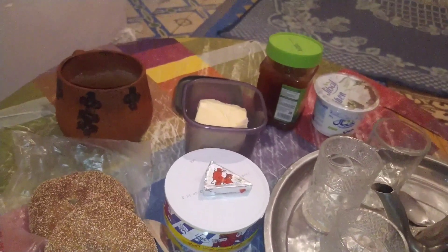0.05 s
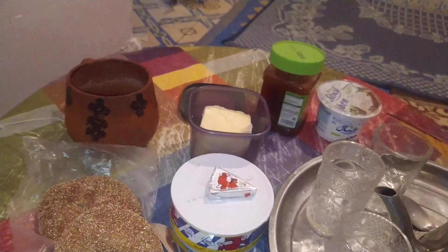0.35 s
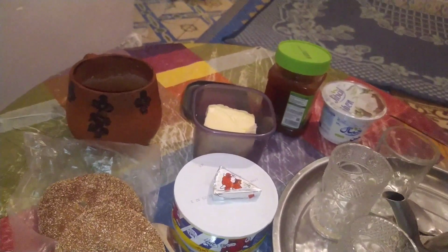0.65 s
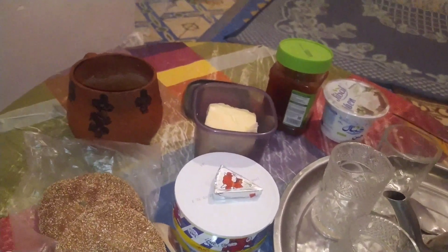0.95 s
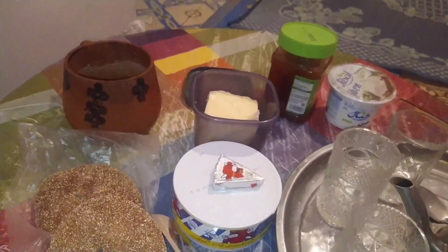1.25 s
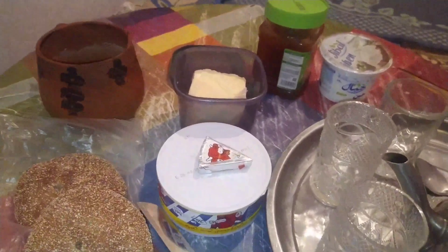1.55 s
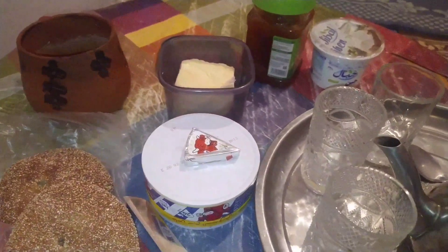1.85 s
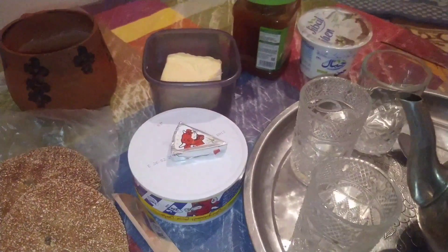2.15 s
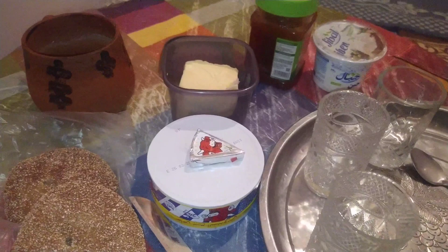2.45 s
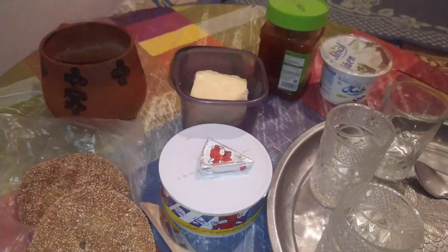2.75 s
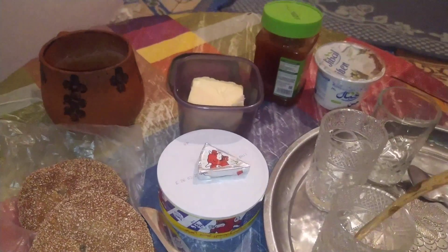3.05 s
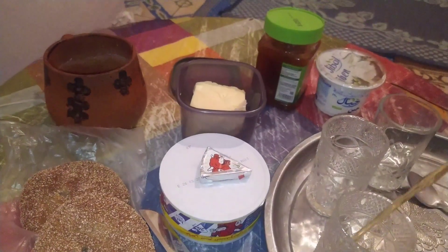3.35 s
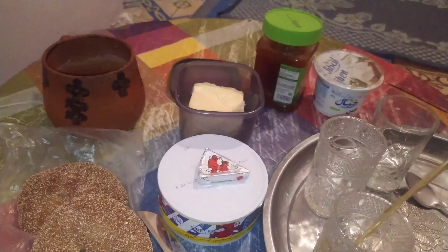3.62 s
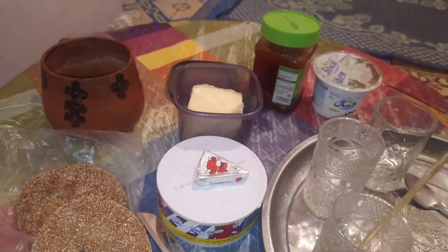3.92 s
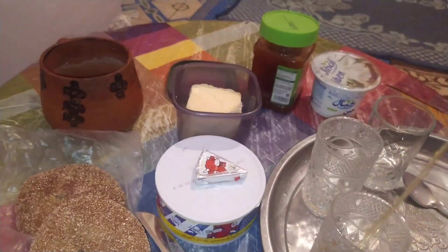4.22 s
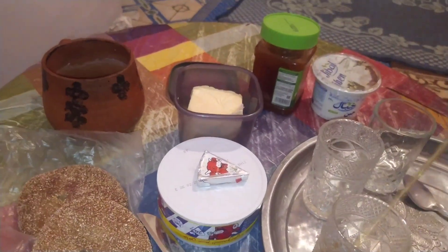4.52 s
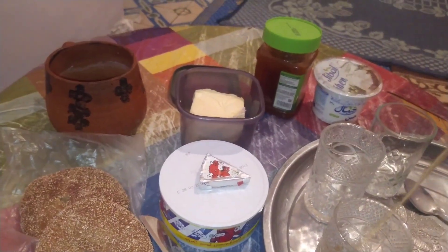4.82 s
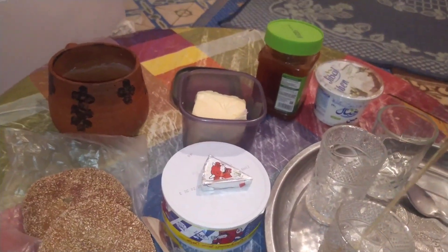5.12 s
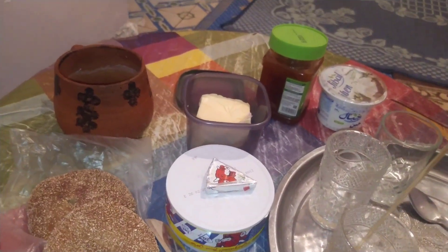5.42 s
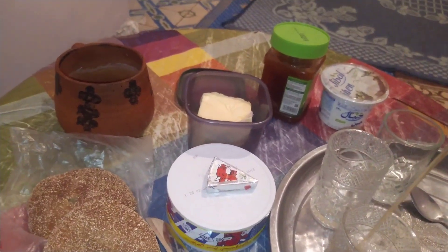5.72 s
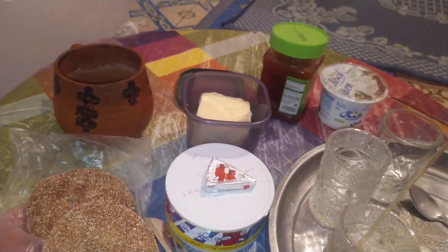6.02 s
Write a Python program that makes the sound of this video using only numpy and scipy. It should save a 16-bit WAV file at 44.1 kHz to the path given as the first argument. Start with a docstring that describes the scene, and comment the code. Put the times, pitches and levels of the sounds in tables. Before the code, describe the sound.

The scene is a small, quiet room, with the microphone near a table. In the first half second come a few light, gritty scrapes and a tap on a metal tray. At about 0.6 seconds a metal teapot gives one sharp, loud clack with a brief ring, and a softer tap follows at 1.1 seconds. From there until about 3 seconds, thin plastic crinkles and snaps quietly further off, thinning out, while a very faint low hum comes and goes. At 3.2 seconds tea begins falling into a glass, first as separate drips, small falling chirps and spurts of spray. By about 4 seconds it is a steady stream, full of bright plops, ticking droplets and fine fizz, over a gurgle that sinks as the liquid deepens. The pour is strongest around 4.5 seconds and is still running, slightly softer, at the end near 6.3 seconds.

```python
"""In a small room, a metal teapot is taken from its tray with one sharp clack that sets its modes ringing,
while plastic crinkles further off. Then tea falls from a height into a glass. The jet traps air, and each
bubble rings as a damped oscillator: first come falling chirps and spurts of spray, then plops near the
note of the air in the glass, over a gurgle that sinks as the pool deepens. A faint hum comes and goes."""
import sys
import numpy as np
from scipy import signal
from scipy.fft import rfft, irfft
from scipy.io import wavfile
from scipy.ndimage import uniform_filter1d

SR = 44100
rng = np.random.default_rng(int(sys.argv[2]) if len(sys.argv) > 2 else 0)


def store_pcm(level_fs):
    """Save levels as 16-bit WAV."""
    pcm = np.round(np.clip(level_fs, -1, 1) * 32767).astype(np.int16)
    wavfile.write(sys.argv[1], SR, np.atleast_2d(pcm).T)


N = 276507
TIME = np.arange(N) / SR
POUR_S, BAND_LIMIT_HZ = 3.2, 16300

# Strength of the jet, from drips to a steady pour. Each row: time in seconds, level in dB.
JET_STRENGTH = [(3.2, -20), (3.3, -10.5), (3.36, -9.5), (3.52, -8.5), (3.8, -3), (4.1, -2), (4.55, 0),
                (5.6, -1.5), (5.74, -4.5), (5.8, -1), (6.17, -3.5), (6.27, -5.5)]
# The first bubbles. Each row: start in seconds, level in dB, first and last pitch in Hz, splash in dB.
CHIRPS = [(3.259, -33.5, 1450, 1010, -2), (3.339, -34, 1950, 1340, 4), (3.354, -41, 2350, 1920, -7),
          (3.362, -40, 2250, 1560, -3), (3.376, -36, 1410, 980, -6), (3.445, -41, 1090, 850, 4),
          (3.513, -40, 836, 735, 0), (3.552, -31, 1740, 1320, -8), (3.686, -28, 1410, 820, -3),
          (3.729, -30, 1380, 1070, -5), (3.786, -19.5, 1460, 876, -29), (3.801, -25.5, 1793, 1210, -18),
          (3.883, -20, 1468, 700, -13), (4.027, -28, 1500, 666, -20), (4.052, -24.5, 1050, 750, -3)]
# The largest bubbles. Each row: start in seconds, level in dB, pitch in Hz, relative splash in dB.
PLOPS = [(3.645, -37, 1180, 3), (3.758, -28, 1280, 4), (3.966, -25.5, 1230, -22), (4.025, -21, 1370, -8),
         (4.071, -20.5, 596, -20), (4.104, -28, 610, -10), (4.185, -20, 587, -10), (4.209, -20.5, 1195, -8),
         (4.296, -29.5, 1186, 3), (4.334, -21, 1240, -5), (4.41, -8, 1300, -18), (4.431, -36, 1460, 14),
         (4.497, -14.5, 1395, -17), (4.535, -16, 1220, -16), (4.674, -24.5, 1270, -20),
         (4.696, -15, 1310, -6), (4.731, -30, 1420, -22), (4.822, -21, 1294, -6), (4.879, -17.5, 1240, -35),
         (4.961, -17.5, 1503, -2), (4.997, -19, 1395, -4.5), (5.027, -24, 1294, -22),
         (5.072, -20.5, 1260, -34), (5.162, -17.5, 1335, -5), (5.191, -20.5, 1360, -11),
         (5.253, -20.5, 1350, -32), (5.282, -22, 1360, -25), (5.321, -23, 1360, -6),
         (5.343, -17.5, 1347, -9.5), (5.364, -20.5, 1320, -4), (5.469, -22, 1430, -13),
         (5.516, -16.5, 1310, -8), (5.553, -19.5, 1530, -28), (5.57, -17, 1290, -28),
         (5.612, -23.5, 1240, 1.5), (5.687, -18.5, 1335, -9.5), (5.771, -22.5, 1370, -3),
         (5.8, -19, 1450, -3), (5.824, -18.5, 1360, -8), (5.857, -27.5, 1400, 6), (5.904, -27, 1420, -20),
         (5.921, -15, 1426, -29), (6.016, -18.5, 1380, -35), (6.118, -23, 1356, -21),
         (6.165, -20.5, 1370, -11)]
# What the glass lets out of the pool's low sound. Each row: frequency in Hz, gain in dB.
POOL_SPECTRUM = [(120, -22.5), (180, 3), (260, -2), (390, 2), (650, -2.5), (880, 7), (1040, -2.5),
                 (1300, -26), (2500, -21)]
# The colour of splashing. Each row: frequency in Hz, gain in dB.
SPLASH_SPECTRUM = [(900, -39), (1600, 6.5), (2300, -2.5), (3100, -1.5), (4500, -17), (7000, 18.5),
                   (8800, -42), (10500, 7.5), (16000, -18)]


def amp(db):
    """Amplitude ratio of a level in decibels."""
    return 10 ** (np.asarray(db) / 20)


def unit_rms(x):
    """Normalisation to unit mean power."""
    return x / np.sqrt(np.mean(x ** 2) + 1e-20)


def at_hz(points, hz):
    """Interpolation on a logarithmic frequency axis."""
    frequencies, values = np.transpose(points)
    return np.interp(np.log(hz + 1), np.log(frequencies + 1), values)


def at_time(rows, s):
    """Linear interpolation of a curve at time s."""
    return np.interp(s, *np.transpose(rows))


def add(mix, s, sound):
    """Superposition: a sound joins the mix at time s."""
    part = mix[max(round(s * SR), 0):][:len(sound)]
    part += sound[:len(part)]


def colour(x, spectrum):
    """Minimum-phase filtering, of unit energy, with the given spectrum."""
    log_gain = np.log(amp(at_hz(spectrum, abs(np.fft.fftfreq(4096, 1 / SR)))))
    response = np.exp(np.conj(signal.hilbert(log_gain)))
    taps = np.fft.ifft(response).real[:2048]
    return signal.oaconvolve(x, taps / np.linalg.norm(taps))[:len(x)]


def burst(t, decay_s):
    """White noise in exponential decay."""
    return rng.standard_normal(len(t)) * np.exp(-t / decay_s)


def clicks(size, per_s, spread_db):
    """A Poisson train of impulses, most of them small."""
    chance, height, sign = rng.random(size), rng.exponential(1, size), rng.choice([-1., 1.], size)
    return sign * amp(spread_db * np.minimum(height, 3)) * (chance < per_s / SR)


def bubble(hz, cycles, rise):
    """A damped oscillator swells for some cycles and dies; a bubble's pitch rises near the surface."""
    age = np.arange(0, 6, hz / cycles / SR)  # in swell times
    turns = cycles * (age + rise * (age * age / 2 - age)) + rng.random()
    return (age * np.exp(1 - age)) ** 2 * np.sin(2 * np.pi * turns)


def diffuse(pair):
    """A diffuse field is partly coherent at two nearby points."""
    # Each row: frequency in Hz, correlation of the channels.
    coherence = [(30, 0.064), (150, 0.072), (350, 0.34), (900, 0.036), (2000, 0.19), (15000, 0.093)]
    left, other = rfft(pair)
    alike = at_hz(coherence, np.fft.rfftfreq(pair.shape[1], 1 / SR))
    return irfft([left, alike * left + np.sqrt(1 - alike ** 2) * other], pair.shape[1])


def in_room(x, wet_db, left_db, lead):
    """Direct sound, left_db louder and lead samples earlier on the left, plus diffuse reverberation."""
    # Each row: frequency in Hz, time to fall 60 dB in seconds.
    reverb_times = [(150, 1), (500, 0.5), (1500, 0.38), (4700, 0.3), (8000, 0.27), (15000, 0.11)]
    hz, t, bands = signal.stft(rng.standard_normal((2, SR // 2)), SR, nperseg=256)
    decay = amp(-60 * t / at_hz(reverb_times, hz)[:, None])
    onset = 1 - np.exp(-(t / .00067) ** 2)
    tail = diffuse(signal.istft(bands * decay * onset, SR)[1])
    wet = signal.fftconvolve(x[None], tail / np.linalg.norm(tail[0]), axes=1)[:, :N]
    delayed = irfft(rfft(x) * np.exp(-2j * np.pi * np.fft.rfftfreq(N) * lead), N)
    direct = np.array([x * amp(left_db / 2), delayed * amp(-left_db / 2)])
    return direct + amp(wet_db) * wet * amp([[.7], [-.7]])


def room_air():
    """Still air is heard as a faint diffuse field of noise."""
    # Each row: frequency in Hz, gain in dB.
    spectrum = [(12, 12.5), (25, -0.5), (50, -3), (100, -15), (250, -10), (600, -18), (2000, -33.5),
                (4500, -29.5), (8500, -28.5), (10500, -38.5), (15000, -47)]
    noise = np.array([unit_rms(colour(x, spectrum)) for x in rng.standard_normal((2, N))])
    return amp(-58) * diffuse(noise) * amp([[-1.5], [1.5]])


def hum():
    """Slow modulation makes a low tone waver; it swells and sinks together with a band of noise."""
    # Each row: time in seconds, pitch in Hz.
    pitch = [(1.15, 194.3), (1.3, 175), (1.5, 177.3), (1.65, 198.5)]
    # Each row: start in seconds, length in seconds, level in dB.
    swells = [(0.05, 0.36, -60.5), (0.425, 0.4, -55.5), (1.002, 0.69, -61.5), (1.715, 0.15, -56),
              (1.903, 0.43, -61.5), (3.676, 0.31, -68.5)]
    level = np.full(N, amp(-71.5))
    for s, length, db in swells:
        add(level, s, amp(db) * np.sin(np.pi * np.linspace(0, 1, round(length * SR)) ** .55))
    waver = unit_rms(uniform_filter1d(rng.standard_normal(N), SR // 20))
    tone = unit_rms(np.sin(2 * np.pi * np.cumsum(at_time(pitch, TIME) + 3 * waver) / SR))
    band = signal.butter(2, [110, 290], "band", fs=SR, output="sos")
    murmur = unit_rms(signal.sosfilt(band, rng.standard_normal(N)))
    return level * (amp(-3) * tone * (1 + .35 * waver) + amp(-3.5) * murmur)


def hollow_tones():
    """Two soft, hollow tones swell and die as damped oscillations."""
    # Each row: start in seconds, level in dB, pitch in Hz, swell in cycles.
    tones = [(1.715, -49, 310, 4.3), (2.669, -68, 661.5, 50)]
    out = np.zeros(N)
    for s, db, hz, cycles in tones:
        add(out, s, amp(db) * bubble(hz, cycles, rise=-.0027))
    return in_room(out, wet_db=-15, left_db=-2, lead=1)


def plastic():
    """Thin plastic buckles in snaps over a soft rustle; at a distance, reverberation dominates."""
    # Each row: start in seconds, level in dB.
    snaps = [(0.189, -43.5), (1.173, -35.5), (1.234, -37), (1.269, -31), (1.345, -37), (1.402, -42),
             (1.473, -42), (1.511, -43.5), (1.56, -39.5), (1.591, -37), (1.689, -40.5), (1.719, -39.5),
             (1.903, -36.5), (1.972, -38.5), (2.005, -44), (2.032, -38), (2.065, -38), (2.168, -38.5),
             (2.188, -40), (2.343, -38.5), (2.472, -40), (2.54, -41), (2.646, -41.5), (2.735, -43.5),
             (2.883, -49), (2.947, -49), (3.127, -53.5)]
    # Each row: frequency in Hz, gain in dB.
    spectrum = [(180, -13), (300, -17.5), (511, -13), (900, -6), (1190, -8), (2000, -3), (6000, -17),
                (8500, -9.5), (11000, -27.5), (16000, -34.5)]
    # Two spells of handling. Each row: time in seconds, level in dB.
    rustle = [(0, -49.5), (.35, -44), (.55, -43.5), (.95, -54), (1.15, -37.5), (1.5, -49.5), (2.05, -47),
              (2.6, -56.5), (3.2, -96)]
    t, out = TIME[:SR // 10], np.zeros(N)
    for s, db in snaps:
        creases = unit_rms(clicks(len(t), per_s=1500, spread_db=5)) * np.exp(-t / .007)
        snap = colour(1.18 * burst(t, .001) + .77 * creases, spectrum)
        body = signal.sosfilt(signal.butter(1, 4000, fs=SR, output="sos"), snap)
        treble = snap - body
        add(out, s, amp(db - 8.5) * (body + amp(2) * treble))
    folds = clicks(N, per_s=220, spread_db=8)
    out += amp(at_time(rustle, TIME) - 20) * unit_rms(colour(folds, spectrum))
    return in_room(out, wet_db=4.5, left_db=3, lead=0)


def handling():
    """Friction makes gritty scrapes as the teapot is gripped; soft impacts excite the tray's modes."""
    # Each row: start in seconds, level in dB, brightest frequency in Hz, decay in seconds.
    scrapes = [(0.071, -34.5, 7200, .016), (0.082, -26.5, 7100, .01), (0.298, -37, 6330, .008),
               (0.306, -29.5, 7470, .007), (0.424, -44, 6500, .009), (0.456, -44, 6800, .014),
               (0.999, -42.5, 7740, .01), (1.099, -42.5, 7800, .01)]
    # Each row: ratio to the brightest frequency, gain in dB.
    scrape_shape = [(.05, -22), (.13, -10), (.25, -13), (.48, -8.5), (.62, -4), (.78, -8.5), (1, 3),
                    (1.2, -4.5), (1.45, -16), (2.2, -30)]
    # Each row: start in seconds, level in dB, relative ring in dB.
    taps = [(0.436, -21, -7), (1.079, -25, -22)]
    # Each row: frequency in Hz, gain in dB.
    knock_spectrum = [(500, -23.5), (950, -18.5), (1240, -1.5), (1600, -15.5), (2200, -10.5), (3400, -12),
                      (4600, -9), (5600, -29), (7200, -10.5), (11000, -39.5)]
    # Each row: frequency in Hz, level in dB, time to fall 60 dB in seconds.
    tray_modes = [(1257, -3, 0.042), (3260, -9.5, 0.045), (4240, -10.5, 0.072), (6600, -10.5, .05)]
    t, out = TIME[:SR // 2], np.zeros(N)
    for s, db, hz, decay_s in scrapes:
        envelope = np.exp(-t / decay_s) * (1 - np.exp(-t / .002))
        grit = unit_rms(clicks(len(t), per_s=4000, spread_db=4)) * envelope
        spectrum = [(ratio * hz, gain) for ratio, gain in scrape_shape]
        add(out, s, amp(db - 8.5) * colour(grit, spectrum))
    for s, db, ring_db in taps:
        knock = colour(burst(t, .00092), knock_spectrum)
        add(out, s, amp(db - 8.5) * (knock + amp(ring_db) * ring(t, tray_modes)))
    return in_room(out, wet_db=1.5, left_db=8, lead=5.3)


def ring(t, modes):
    """Free vibration after a blow is a sum of decaying normal modes."""
    return sum(amp(db - 60 * t / t60) * np.sin(2 * np.pi * (hz * t + rng.random()))
               for hz, db, t60 in modes)


def teapot():
    """Impact excites the metal's modes: the lid chatters and rings until it seats; the body rings on."""
    # Each row: start in seconds, force in dB.
    blows = [(0.6315, 7.5), (0.6349, 16.5), (0.6367, -5), (0.6406, 5.5), (0.642, -2), (0.6571, -10.5),
             (0.733, -15)]
    # Each row: frequency in Hz, gain in dB.
    crack_spectrum = [(100, -28), (300, -20), (535, -23), (720, -12), (1020, -19), (1300, -5), (1900, -11),
                      (2580, -8), (3400, -14), (4300, -7), (4880, -1), (5400, -15), (6000, -16), (6900, 0),
                      (8000, -7), (9500, -14), (11500, -27), (16000, -32)]
    # Each row: frequency in Hz, level in dB, time to fall 60 dB in seconds.
    modes = [(877, -15, .35), (1229, -8, .36), (1981, -16, .22), (2567, -8, .28), (3483, -13, .2),
             (4215, -9, .13), (4363, -8, .14), (4403, -7, .17), (4569, -4, .1), (4718, -1, .09),
             (4850, -1, .09), (6654, -6, .19), (6902, -2, .16), (7031, -3, .12), (7374, -4, .16),
             (7472, -7, .19), (8000, -9, .2)]
    t, cracks, ringing = TIME[:SR // 2], np.zeros(N), np.zeros(N)
    for s, db in blows:
        contact = burst(t, .0024) * (1 - np.exp(-t / .0005))
        add(cracks, s, amp(db - 20) * colour(contact, crack_spectrum))
    lid_free = 1 / (1 + np.exp(np.minimum((t - .012) / .001, 50)))  # seats after 12 ms
    lid = amp(-18.5) * ring(t, modes) * lid_free
    body = amp(-30) * ring(t, modes)
    add(ringing, blows[0][0], lid + body)
    return (in_room(cracks, wet_db=-3, left_db=2.5, lead=11.36)
            + in_room(ringing, wet_db=-20, left_db=2.5, lead=1))


def progress(s):
    """The glass fills at a steady rate: 0 as the pour starts, 1 at the end."""
    return np.clip((s - POUR_S) / (TIME[-1] - POUR_S), 0, 1)


def jet_share(s):
    """Air entrainment grows to its full rate as drips join into a jet."""
    return np.interp(s, [POUR_S, POUR_S + 1.1], [.3, 1])


def pool_hz(s):
    """Minnaert resonance: a deepening pool traps larger bubbles, which ring lower."""
    shallow_hz, deep_hz, deepen_s = 1100, 578, .818
    return deep_hz + (shallow_hz - deep_hz) * np.exp(-((s - POUR_S) / deepen_s) ** 2)


def glass_hz(s):
    """The resonance of an air column rises in inverse proportion to its length."""
    empty_hz, final_fill = 1184, .2
    return empty_hz / (1 - final_fill * progress(s))


def wake():
    """Agitation dips as the jet thins before each blob, then jumps and decays exponentially."""
    wake_s, full_wake_db, lull_s, lull_depth = .011, -23, .028, .52
    stir, lull, t = np.zeros(N), np.zeros(N), TIME[:SR // 4]
    for s, db, *_ in CHIRPS + PLOPS:
        add(stir, s - .002, amp((db - full_wake_db) / 2) * np.exp(-t / wake_s))
        add(lull, s - lull_s, np.sqrt(np.linspace(0, 1, round(lull_s * SR))))
    return np.minimum(stir, 1) - lull_depth * np.minimum(lull, 1)


def follow_jet(x, db, exponent, fill_db, wake_db):
    """Amplitude is a power law of the jet's strength, shifted by the filling and by each wake."""
    level_db = db + exponent * at_time(JET_STRENGTH, TIME) + fill_db * progress(TIME) + wake_db * wake()
    return amp(level_db) * x / np.std(x[TIME > POUR_S])


def clumps():
    """Spray flies in clumps: a log-normal gain that changes every few hundredths of a second."""
    drift = unit_rms(uniform_filter1d(rng.standard_normal(N), round(.025 * SR)))
    return unit_rms(amp(4 * drift))


def swarm(per_s, pitch, cycles, spread_db):
    """Random bubbles add incoherently; pitch(s, z) gives Hz from the time and a bell-shaped draw."""
    out = np.zeros(N)
    for when, chance, quantile, size, length in rng.random((round(per_s * TIME[-1]), 5)):
        s = when * TIME[-1]
        if s > POUR_S and chance < jet_share(s):
            z = np.clip(np.log(quantile / (1 - quantile)) / 2, -2, 2)
            hz = min(pitch(s, z), BAND_LIMIT_HZ)
            db = spread_db * min(-np.log(size), 2)
            add(out, s, amp(db) * bubble(hz, cycles * (.5 + length), rise=.035))
    return out / np.sqrt(jet_share(TIME))  # power stays independent of the rate


def spray():
    """The smallest sources sound highest: tiny bubbles fizz, bursting froth crackles and mist hisses."""
    # Three spectra. Each row: frequency in Hz, gain in dB.
    fizz_spectrum = [(1500, -30), (3000, 32), (5000, 2.5), (7000, -0.5), (8800, 13.5), (10300, -4),
                     (13000, -48), (16000, -40)]
    froth_spectrum = [(1200, -16), (2600, -25), (4000, 4.5), (6500, -13), (9000, 2), (11000, -10.5),
                      (16000, -33)]
    mist_spectrum = [(6000, -38.5), (9500, -4), (11500, 0.5), (14000, 4), (15200, 2), (16300, -27.5)]
    # The mist thins once the pool is deep. Each row: time in seconds, level in dB.
    mist_level = [(3.2, -100), (3.33, -82), (3.58, -74), (4.3, -74), (4.5, -69), (4.85, -71), (5.15, -78),
                  (5.7, -83), (6.27, -85)]
    fizz = swarm(550, lambda s, z: 7500 * np.exp(.22 * z), cycles=3, spread_db=9)
    froth = colour(clicks(N, per_s=110, spread_db=7), froth_spectrum)
    mist = unit_rms(colour(clicks(N, per_s=3500, spread_db=4), mist_spectrum))
    out = follow_jet(colour(fizz, fizz_spectrum), db=-52, exponent=.9, fill_db=0, wake_db=9)
    out += follow_jet(froth, db=-54.5, exponent=1.5, fill_db=-2, wake_db=5) * (TIME > POUR_S)
    out += amp(at_time(mist_level, TIME) + 8 * wake()) * mist
    return in_room(out * clumps(), wet_db=-8, left_db=3.5, lead=3.5)


def small_drops(per_s=16, top_hz=9200, octaves=1.1, tick_db=-24, spit_db=-10):
    """Lesser drops land at uniformly random times, louder in a stronger jet."""
    length = TIME[-1] - POUR_S
    when, size, pitch = rng.random((round(per_s * length), 3)).T
    starts = POUR_S + length * when
    levels = -40 + 16 * (size - .5) + at_time(JET_STRENGTH, starts)
    pitches = top_hz / 2 ** (octaves * pitch ** 2)
    return [(s, db, hz, tick_db, spit_db) for s, db, hz in zip(starts, levels, pitches)]


def drops():
    """Drop impact: each ticks on the glass, spits as it breaks up and traps a tiny bubble that pings."""
    # Each row: start in seconds, level in dB, pitch in Hz, relative tick and spit in dB.
    large_drops = [(3.2073, -26.5, 7530, -34, -19.5), (3.26, -37, 8900, -32, -23),
                   (3.32, -36, 8100, -29, -27), (3.3304, -35, 8500, -26, -13), (3.347, -26, 8000, -35, -14),
                   (3.3557, -33, 8850, -30, -21), (3.4218, -34.5, 8900, -16, -16),
                   (3.4466, -38, 8460, -23, -5), (3.5338, -38, 7800, -26, -0.5),
                   (3.5464, -24, 7550, -36, -15), (3.593, -27.5, 7070, -18, -5),
                   (3.6444, -23, 6000, -30, -13), (3.6545, -19, 9030, -44, -17),
                   (3.687, -23, 8600, -42, -33), (3.712, -30, 9000, -42, -9), (3.7696, -30, 9200, -12, 3.5),
                   (3.801, -12.5, 8380, -43, -34), (3.8134, -18.5, 9100, -47, -13),
                   (3.883, -35, 8450, -25, 3), (3.9586, -17, 8230, -30, -15), (4.068, -31.5, 9000, -25, -1),
                   (4.1818, -31, 9150, -27, -23), (4.1959, -24, 7840, -38, -8),
                   (4.2375, -37, 8500, -29, 7.5), (4.4061, -27, 7800, -23, 2.5),
                   (4.447, -35, 8060, -5, 6.5), (4.463, -31, 8100, -23, 6), (4.47, -22, 6050, -27, -13.5),
                   (4.5329, -20, 7640, -33, -8), (4.614, -37.5, 8040, -2.5, 0.5),
                   (4.731, -20, 7960, -20, -10.5), (4.862, -31, 8350, -22, -13),
                   (4.9592, -16.5, 8230, -47, -19), (5.0154, -21, 8700, -28, -14),
                   (5.1599, -17.5, 5750, -36, -9.5), (5.4106, -34, 8800, -11, -1),
                   (5.459, -18, 7050, -34, -12), (5.555, -18.5, 7900, -34, -13.5),
                   (5.5877, -13.5, 7200, -53, -16), (5.9187, -33.5, 8500, -36, 5),
                   (5.997, -24.5, 6990, -29, -26), (6.113, -21, 8340, -37, -14.5)]
    # Two spectra. Each row: frequency in Hz, gain in dB.
    tick_spectrum = [(2000, -19), (8000, 4), (11500, -5), (13000, -8), (16000, -14.5)]
    spit_spectrum = [(900, -15), (3000, -4.5), (6500, 5.5), (9000, 5.5), (10500, -15), (16000, -29)]
    t, spits, pings = TIME[:SR // 20], np.zeros(N), np.zeros(N)
    for s, db, hz, tick_db, spit_db in large_drops + small_drops():
        add(pings, s + .0006, amp(db - 2) * bubble(hz, cycles=4.2, rise=.02))
        add(pings, s + .0005, amp(db + tick_db + 8) * colour(burst(t, .0016), tick_spectrum))
        add(spits, s + .0005, amp(db + spit_db + .5) * colour(burst(t, .0022), spit_spectrum))
    return (in_room(spits, wet_db=-5, left_db=3, lead=3.5)
            + in_room(pings, wet_db=-10, left_db=3.5, lead=3.5))


def spurts():
    """The jet's impact on the wall of the glass sheds showers of tiny bubbles that quickly thin out."""
    # Each row: start in seconds, length in seconds, level in dB.
    showers = [(3.555, 0.091, -53), (3.643, 0.0096, -42), (3.758, 0.013, -37), (3.772, 0.0087, -43.5),
               (3.882, .015, -48.5), (4.022, .014, -42), (4.204, 0.016, -46.5), (4.408, 0.018, -53)]
    out = np.zeros(N)
    for s, length, db in showers:
        shower = np.zeros(round(length * SR))
        for when, size, pitch in rng.random((40, 3)):
            hz = 2700 * 2 ** (1.5 * pitch ** 2)
            add(shower, length * when ** 2, amp(-12 * size) * bubble(hz, cycles=2.2, rise=.05))
        add(out, s, amp(db) * unit_rms(shower))
    return in_room(out, wet_db=-7, left_db=2, lead=4.9)


def stream():
    """Entrained air rings near the note of the glass, in fine spatter and in a sinking gurgle."""
    # What the open mouth of the glass radiates. Each row: frequency in Hz, gain in dB.
    mouth_spectrum = [(400, -24), (700, -9), (870, 9), (1040, -1), (1170, 9), (1480, 12), (1800, 6),
                      (6000, -8)]
    near_note = swarm(200, lambda s, z: glass_hz(s) * np.exp(.11 * z), cycles=2, spread_db=7)
    fine = swarm(380, lambda s, z: 3000 * np.exp(.32 * z), cycles=2.4, spread_db=6.5)
    # a deeper pool traps a wider range of bubble sizes
    deep = swarm(700, lambda s, z: pool_hz(s) * (1500 / pool_hz(s)) ** (.42 * z), cycles=1.8, spread_db=2)
    churn = follow_jet(colour(near_note, mouth_spectrum), db=-47.5, exponent=1.53, fill_db=7, wake_db=.5)
    spatter = follow_jet(colour(fine, SPLASH_SPECTRUM), db=-51.5, exponent=1, fill_db=-4, wake_db=7.5)
    gurgle = follow_jet(colour(deep, POOL_SPECTRUM), db=-44, exponent=1.6, fill_db=-10, wake_db=9.5)
    return (in_room(churn + spatter * clumps(), wet_db=-4, left_db=1, lead=4.95)
            + in_room(gurgle, wet_db=-15.5, left_db=-1, lead=8.6))


def splash():
    """An impact on the pool throws a puff of spatter and traps four small bubbles."""
    t = TIME[:SR // 20]
    out = amp(-4) * burst(t, .004) * (1 - np.exp(-t / .001))
    for when, size in rng.random((4, 2)):
        add(out, .007 * when, bubble(1900 + 1800 * size, cycles=2.2, rise=.05))
    return colour(out, SPLASH_SPECTRUM)


def chirps(swell_s=.0042, fall_s=.006):
    """The resonance of each early bubble glides down as the jet digs into the shallow pool."""
    t, out = TIME[:SR // 20], np.zeros(N)
    envelope = (t / swell_s * np.exp(1 - t / swell_s)) ** 2
    for s, db, start_hz, end_hz, splash_db in CHIRPS:
        hz = end_hz + (start_hz - end_hz) * np.exp(-(t / fall_s) ** 2)
        tone = np.sin(2 * np.pi * (np.cumsum(hz) / SR + rng.random()))
        add(out, s, amp(db - 10.5) * envelope * tone)
        add(out, s, amp(db + splash_db - 12) * splash())
    return in_room(out, wet_db=-2.5, left_db=4, lead=1.58)


def fragments(hz):
    """Fragmentation: five bubbles of scattered pitch tear off a plop within milliseconds."""
    out = np.zeros(SR // 20)
    for when, size in rng.random((5, 2)):
        add(out, .009 * when ** 2, bubble(hz * 2 ** (1.5 * size - .6), cycles=1.4, rise=0))
    return out


def plops(swell_s=.0024):
    """Large bubbles resonate, most near the note of the glass; each pushes the pool and splashes."""
    # The push on the pool. Each row: time in seconds, base level in dB.
    push_level = [(3.2, -43), (3.8, -38), (4.1, -32), (6.27, -50)]
    # Deep bubbles in the filling glass. Each row: start in seconds, level in dB, pitch in Hz.
    glugs = [(4.862, -43, 361), (5.189, -42.5, 353), (5.256, -41, 378)]
    out = np.zeros(N)
    for s, db, hz, splash_db in PLOPS:
        push = np.zeros(SR // 20)
        add(push, 0, bubble(pool_hz(s) * rng.uniform(.65, 1), cycles=.6, rise=.08))
        add(out, s - .0005, amp(db - 9) * bubble(hz, cycles=hz * swell_s, rise=.00051))
        add(out, s, amp(db - 20 - 22 * progress(s)) * fragments(hz))  # less tearing as the glass fills
        add(out, s, amp(.61 * db + at_time(push_level, s)) * colour(push, POOL_SPECTRUM))
        add(out, s - .001, amp(db + splash_db - 15) * splash())
    for s, db, hz in glugs:
        add(out, s, amp(db) * bubble(hz, cycles=3.2, rise=0))
    return in_room(out, wet_db=-9, left_db=3, lead=1.25)


def scene():
    """The pressures of all sources add by superposition."""
    at_table = handling() + teapot() + plastic()
    pour = chirps() + plops() + stream() + spurts() + spray() + drops()
    return at_table + pour + room_air() + hum() + hollow_tones()


def record(dry):
    """Saturation just clips the clack; a low-pass filter then limits the band."""
    low_pass = signal.firwin(511, BAND_LIMIT_HZ, window=("kaiser", 9), fs=SR)
    return signal.oaconvolve(np.clip(dry, -1, 1), low_pass[None], "same")


dry = scene()
out = record(dry)
store_pcm(out)
```